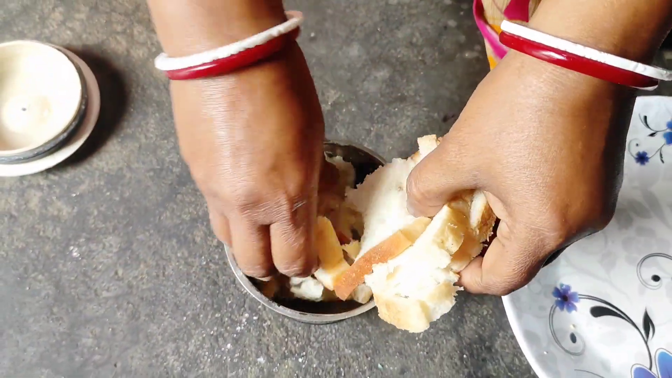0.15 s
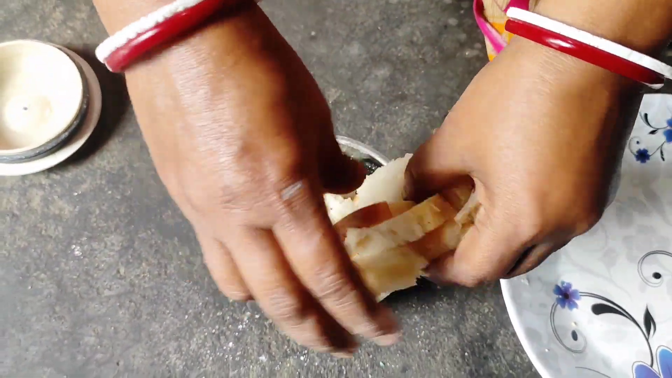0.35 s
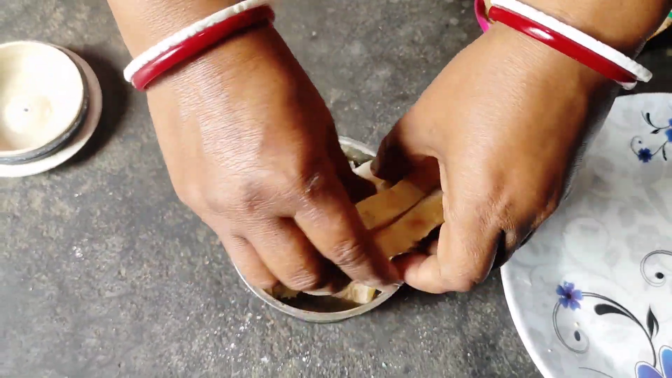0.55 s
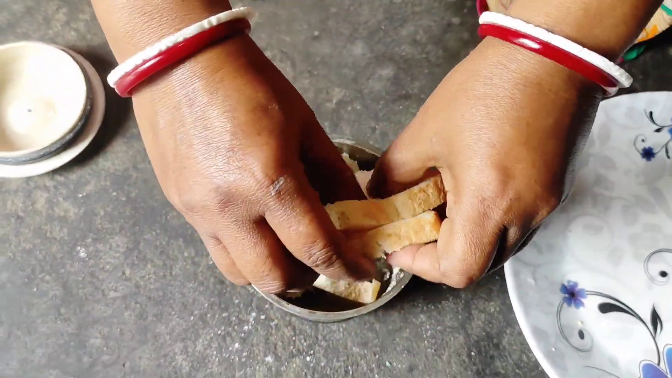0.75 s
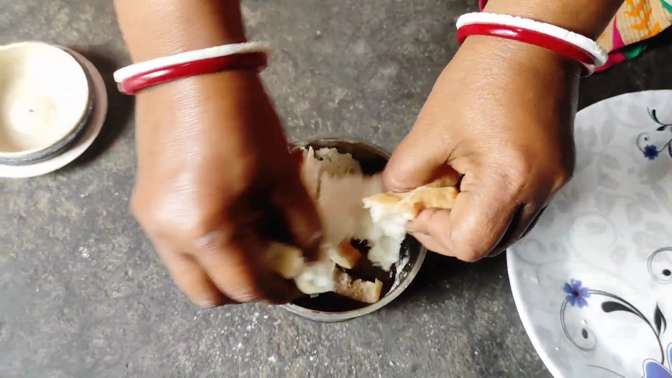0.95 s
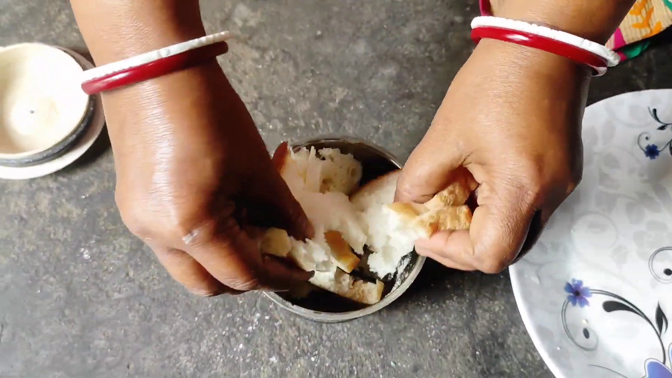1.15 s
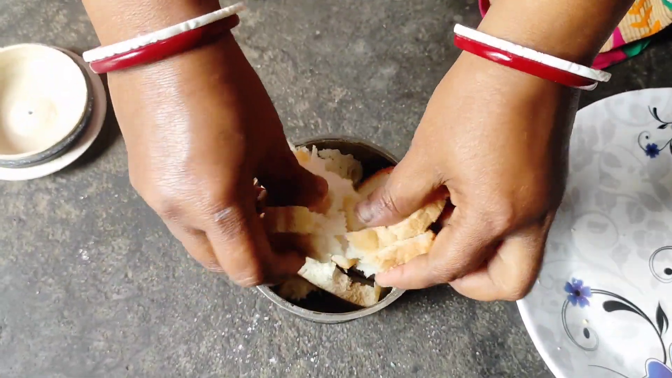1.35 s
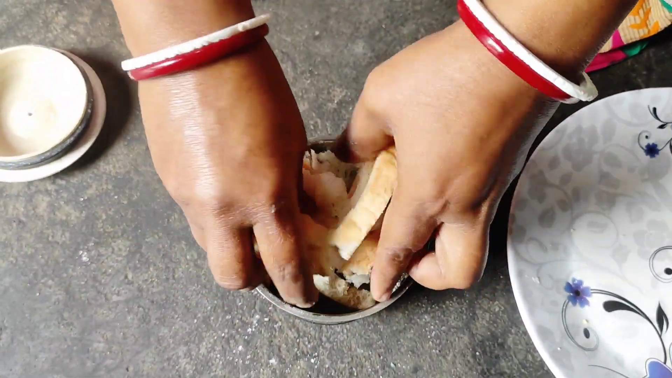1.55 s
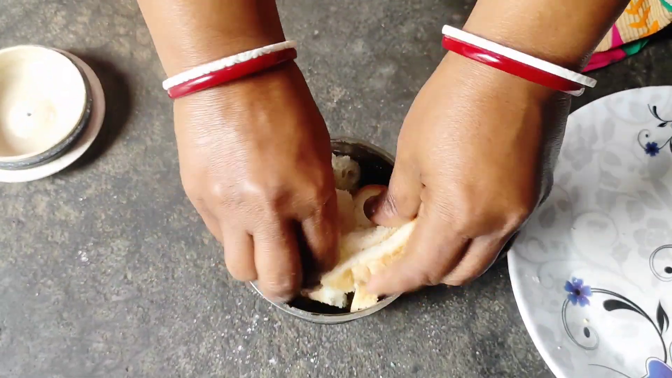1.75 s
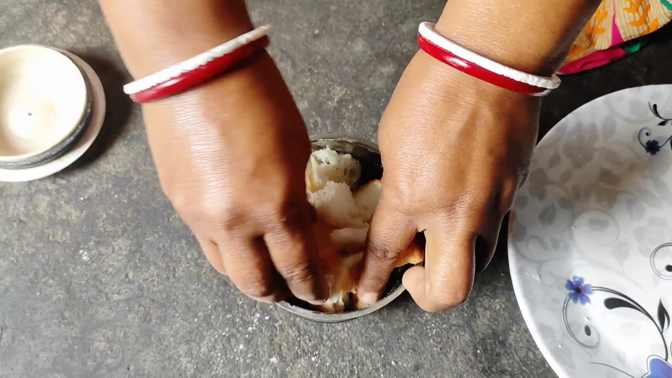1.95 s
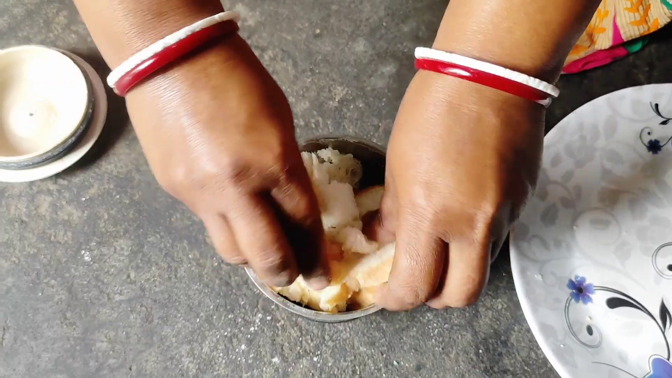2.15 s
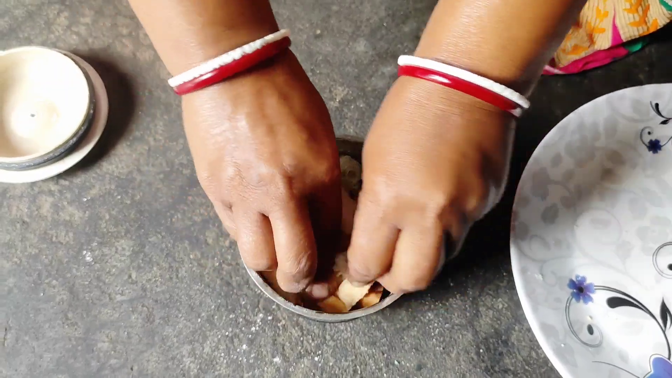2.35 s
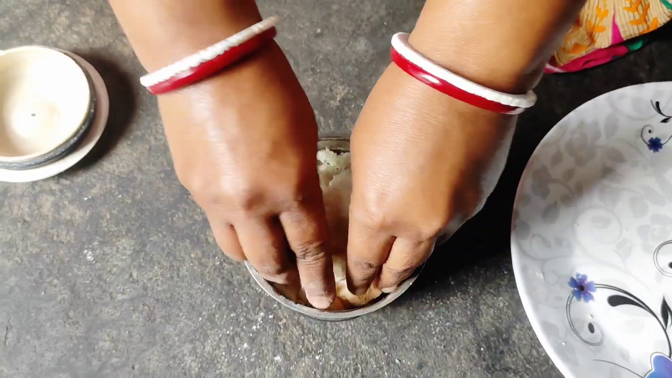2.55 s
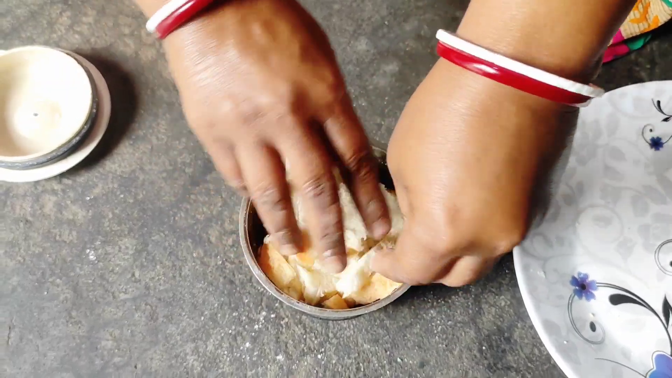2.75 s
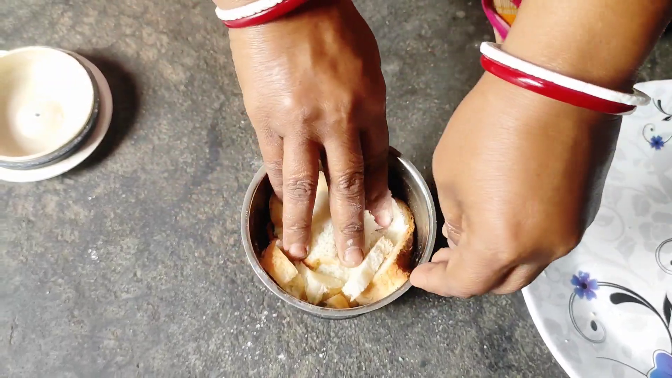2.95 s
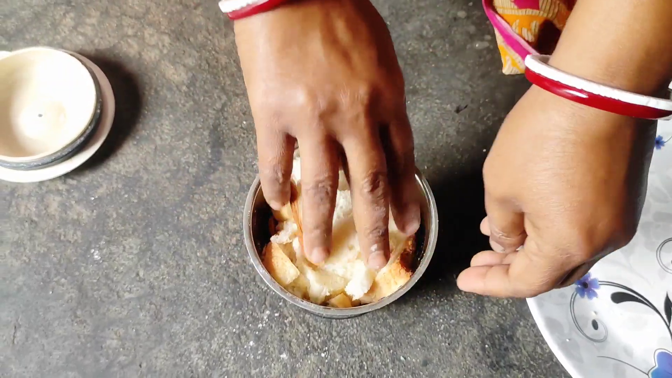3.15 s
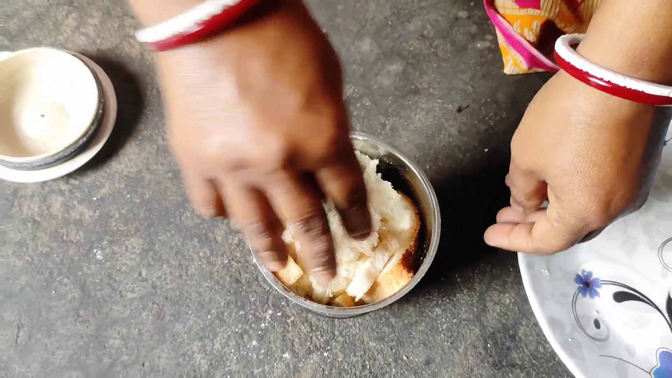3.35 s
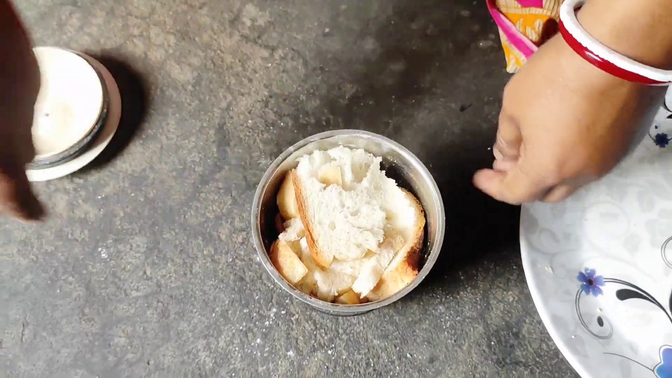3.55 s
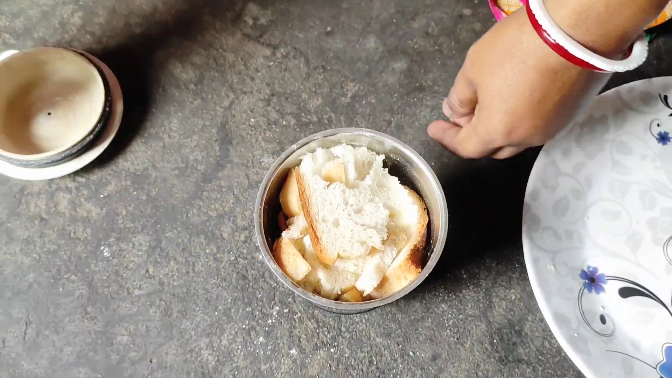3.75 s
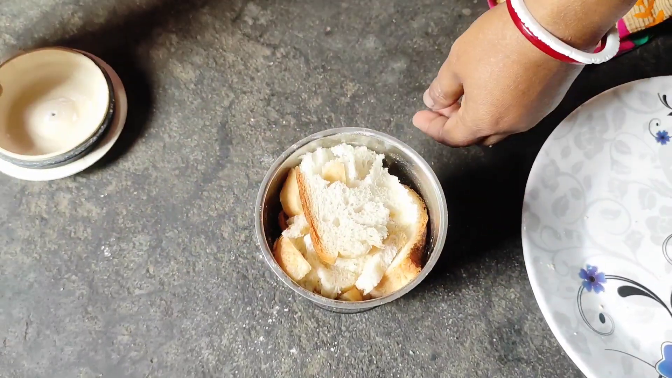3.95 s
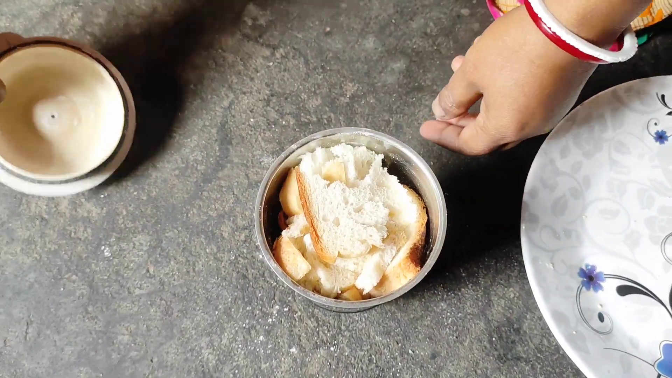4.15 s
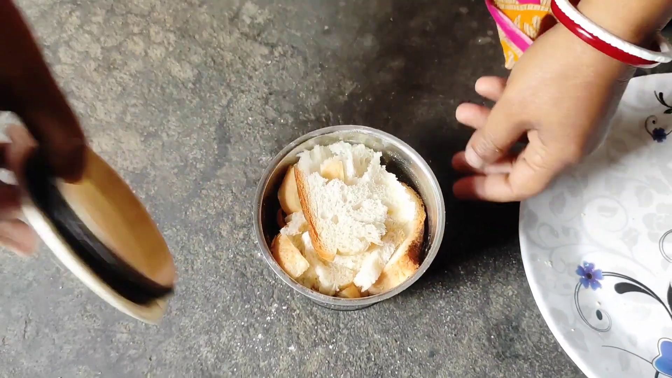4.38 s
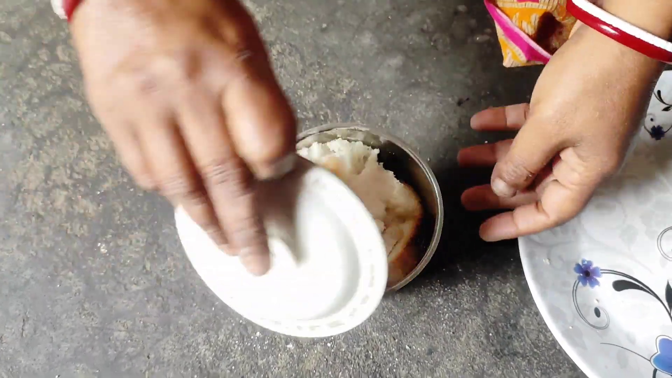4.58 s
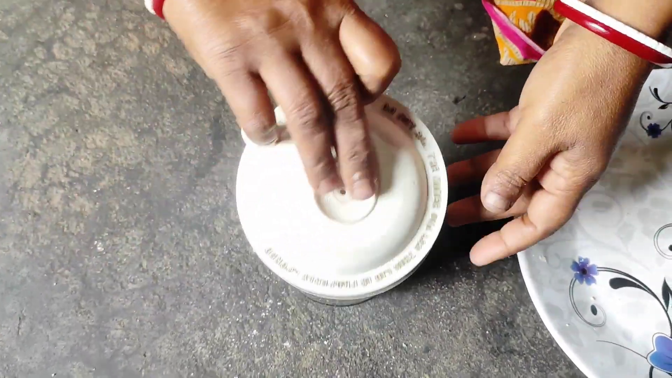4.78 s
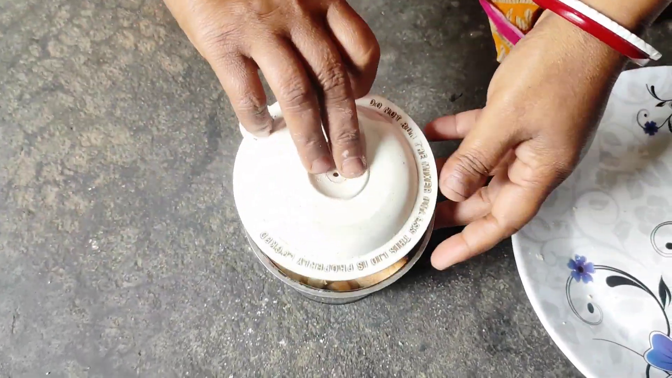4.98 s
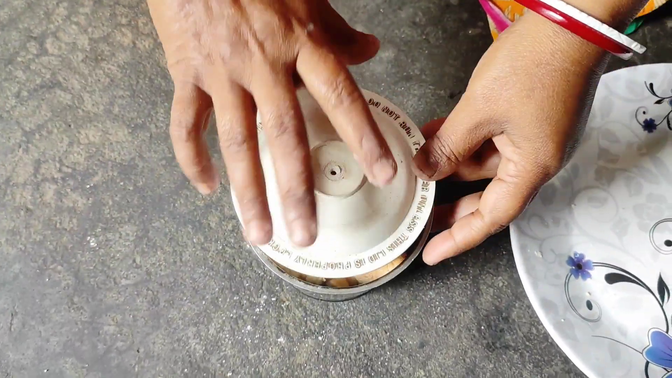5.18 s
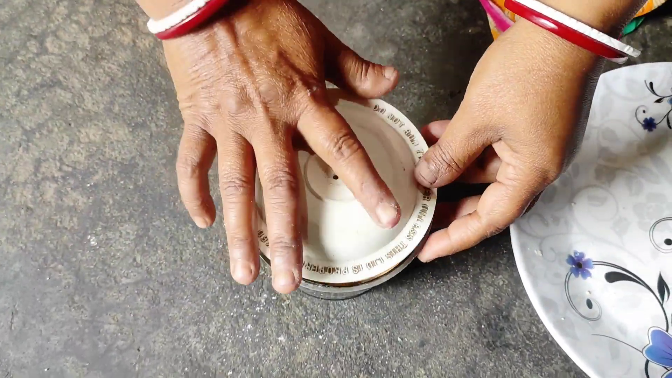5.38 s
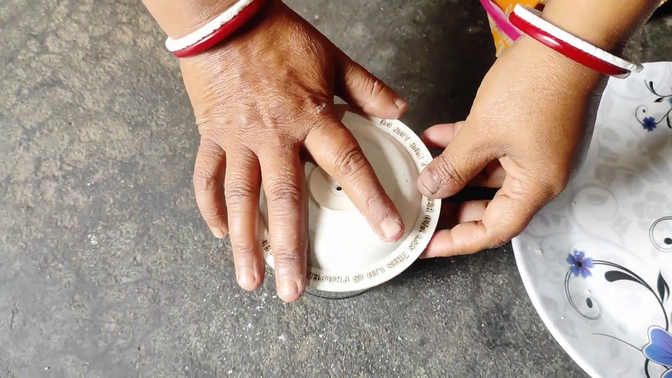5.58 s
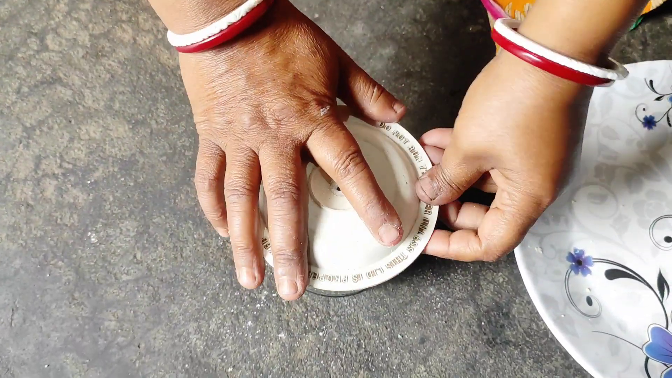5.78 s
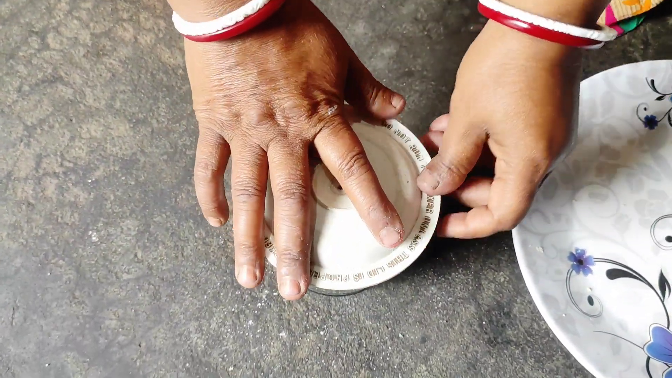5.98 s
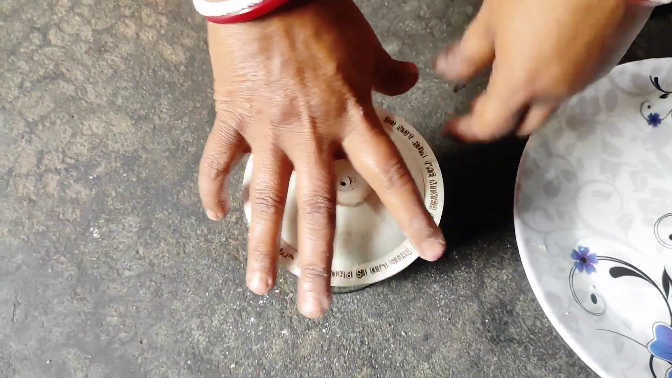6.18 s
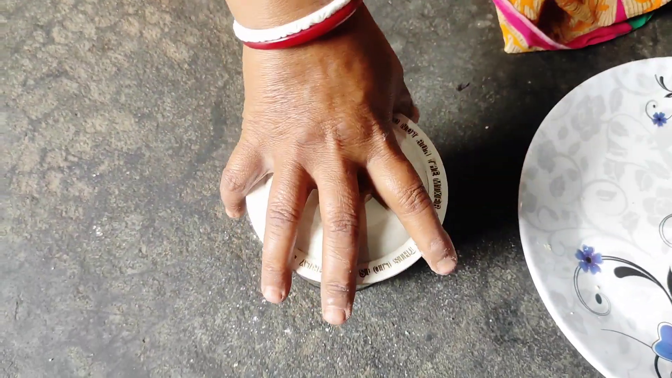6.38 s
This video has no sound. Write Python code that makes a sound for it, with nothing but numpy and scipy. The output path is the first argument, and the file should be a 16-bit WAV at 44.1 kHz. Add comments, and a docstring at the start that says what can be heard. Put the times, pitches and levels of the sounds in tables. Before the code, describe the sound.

Close stereo pickup from above in a bare, hard-walled home: soft bread tearing and small nail and crust ticks over low hum, one faint bangle clink, thin echoing bird whistles outside. After a pause, the lid edge ticks on stone, a bright plastic knock hits the steel rim, hollow taps follow, then a very sharp clack. A brief stuttering twist with muffled thuds ends it, leaving light ticks, a rub and bird chirps.

```python
"""A softly humming, hissing room and dry ticks of crust come first, then bread torn into a small steel jar.
The plastic lid catches on a stone floor as it is lifted, knocks onto the rim, is pressed down and twisted shut.
Short pushes excite decaying modes of lid, steel and trapped air; stick-slip drives the twist; band-limited
noise makes ticks, tearing and room noise. Gliding sines make birds far outside, heard mostly as echo.
Hard walls answer the jar; a phone held above hears it in stereo."""
import sys
import numpy as np
from scipy import signal
from scipy.io import wavfile
from scipy.ndimage import uniform_filter1d

SR = 44100
rng = np.random.default_rng(int(sys.argv[2]) if len(sys.argv) > 2 else 0)


def store_pcm(level_fs):
    """Save levels as 16-bit WAV."""
    pcm = np.round(np.clip(level_fs, -1, 1) * 32767).astype(np.int16)
    wavfile.write(sys.argv[1], SR, np.atleast_2d(pcm).T)


N = 283241
T = np.arange(N) / SR

# modes of the plastic lid: (frequency [Hz], relative level [dB], nominal t60 [s])
LID_MODES = [(754, -27.5, 0.0079), (859, 2.5, 0.02), (1000, -11, 0.0075), (1310, -2.5, 0.011),
             (1470, -8.5, 0.012), (1510, -15, 0.013), (2300, -7, 0.02), (2705, -19.5, 0.005),
             (3070, -32, 0.0096), (4150, -15, 0.0046), (5500, -31.5, 0.0038), (8500, -25, 0.0033)]
# air and bread under the lid: (frequency [Hz], relative level [dB], nominal t60 [s])
THUD_MODES = [(141, -6.5, 0.0048), (213.4, -7.5, 0.026), (285, -4.5, 0.0077)]
HANDS_LEFT_DB = 2  # left over right, for ticks and rustles


def knocks():
    """Modal impact: each blow is a short push into lid, steel wall and trapped air; a longer one is duller."""
    # lid against jar: (time [s], blow level [dB], contact time [ms], steel clatter [dB], jar air [dB],
    # thud [dB], ring length factor [ratio; a loose grip rings longer], lid pitch factor [ratio])
    blow_table = [(4.1237, -37, 0.29, 12, -25, -20, 0.86, 1),
                  (4.5876, -9.5, 0.16, -1, -16, -13.5, 1.4, 1.016),
                  (4.644, -20.5, 0.39, -4, -20, -15, 0.97, 1.04),
                  (4.785, -28, 0.58, -26, 2, -0.5, 1.3, 0.92),
                  (4.814, -29.5, 0.77, -12, -6, 0.5, 0.85, 1.05),
                  (4.8422, -22.5, 0.51, -7, 11.5, 0.5, 1, 0.88),
                  (4.9538, -12.5, 0.18, -25, 4, -28, 1.1, 0.96),
                  (4.9605, -11.5, 0.52, -18, -0.5, -23, 0.59, 0.67),
                  (4.962, -4.5, 0.12, -18.5, 7, -19.5, 0.71, 0.94),
                  (4.967, -17, 0.11, -28, 2, -1.5, 0.58, 1.15),
                  (5.519, -43, 0.57, -15.5, -2, 11.5, 2.1, 0.93),
                  (5.589, -25.5, 0.95, 7.5, -2.5, 8.5, 0.88, 0.77),
                  (5.736, -33.5, 0.53, -4, -9, 8, 0.92, 1.3), (5.749, -32.5, 0.67, -2, -5, 2, 1, 0.74),
                  (5.762, -27, 0.66, -10, -11, 6, 1.3, 1.03), (5.776, -27, 0.76, -1, 2, 7, 1.1, 1.2),
                  (5.789, -27, 1, -6, -2, -5, 0.99, 1.32), (5.8014, -30.5, 0.64, 8, -3, 14, 1, 0.93),
                  (5.811, -35.5, 1, -9, 5, 11, 1.1, 1.22), (5.821, -27, 0.58, 3, -2, 7, 1, 1),
                  (6.103, -48, 0.5, -3, 8, -13, 1.6, 0.97), (6.134, -42, 0.3, 3, 6.5, -6, 1.14, 0.9)]
    # modes of the steel wall: (frequency [Hz], relative level [dB], nominal t60 [s])
    steel_modes = [(2227, -15, 0.05), (2940, -28, 0.01), (2970, 2, 0.0086), (3810, -4, 0.0066),
                   (4650, -4, 0.0094), (5480, -5, 0.013), (6380, -6, 0.028), (6900, -19, 0.015),
                   (8200, -44, .012)]
    # air in the jar, sounding with each blow at its own level:
    # (frequency [Hz], relative level [dB], t60 [s])
    air_modes = [(464, -4.5, 0.012), (570, 4, 0.01)]
    # close lid modes blurred together: (frequency [Hz], width [Hz], relative level [dB], nominal t60 [s])
    lid_rattle = (1498.5, 1603.5, -7.5, 0.0454)
    lid_left_db = -1
    loose_tilt_db = 0.5  # a loose grip frees upper lid modes: dB per octave and unit of extra ring length
    seated_s, loose_thud_pitch = 5.2, 1.32  # the thud is higher until the lid is seated

    out, t = np.zeros((2, N)), T[:SR // 8]
    for s, db, ms, steel_db, air_db, thud_db, longer, pitch in blow_table:
        push = np.hanning(int(ms * SR / 1000) + 3)[None]
        # the many close wall modes between the clear ones blur into a short rattle
        rattle = undb(-0.5) * unit(band(pair(5000, len(t), 2500), 3300, 13000)) * fade(t, 0.04)
        hz, width_hz, buzz_db, t60 = lid_rattle
        buzz = unit(band(pair(hz, len(t), 2000), hz, width_hz))
        buzz = undb(buzz_db) * buzz * fade(t, longer * t60)
        lid = buzz + ring(LID_MODES, 1320, longer, pitch, loose_tilt_db * (longer - 1))
        steel = undb(steel_db) * (ring(steel_modes, 1800) + rattle)
        shells = above(lid + steel, 847)  # thin shells move little bass
        air = undb(air_db) * above(ring(air_modes), 767)
        thud_pitch = loose_thud_pitch if s < seated_s else 1
        thud = undb(thud_db) * above(ring(THUD_MODES, pitch=thud_pitch), 150)
        blow = signal.fftconvolve(shells + air + thud, push / push.sum(), axes=1)
        add(out, sided(db, lid_left_db) * blow, s)
    return out


def twist():
    """Stick-slip friction: uneven slips of the lid on the rim, and grit between them, drive its modes; plus hiss."""
    # lid twisting on the rim: (time [s], rubbing level [dB], pressing level [dB])
    effort = [(5.6, -53, -50), (5.66, -55.5, -48), (5.685, -40.5, -41.5), (5.729, -39.5, -37.5),
              (5.769, -38, -51), (5.8, -41.5, -38.5), (5.823, -37, -34.5), (5.845, -76, -63)]
    slips_hz, hiss_db = 94.1, -2.5  # mean slip rate; hiss relative to the rubbed lid
    s, rub_db, press_db = np.transpose(effort)

    def gain(db):
        """Interpolation in dB makes the gain glide between table times."""
        return undb(np.interp(T, s, db, -120, -120))

    slip_count = np.floor(np.cumsum(slips_hz * (1 + .3 * walk(70)) / SR))
    slips = np.diff(slip_count, prepend=0) * undb(1.53 * walk(60))
    grit = 0.07 * rng.standard_normal(N) * undb(4.0 * walk(400))
    drive = (slips + grit)[None]

    def shake(modes):
        """Convolution with the modal response gives the driven vibration."""
        return unit(above(signal.fftconvolve(drive, ring(modes, 1900), axes=1)[:, :N], 110))

    hiss = band(band(pair(4100, N, 1200), 3040, 5150), 3300, 12800)
    hiss = unit(hiss) * undb(1.6 * walk(130) + 1.47 * walk(900))
    rubbing = gain(rub_db) * (shake(LID_MODES) + undb(hiss_db) * hiss)
    return rubbing + gain(press_db) * shake(THUD_MODES)


def ticks():
    """Damped impulses: ticks from the hands, a clink of bangles and the lid's edge on stone."""
    # dry ticks of crust and nails, and the crack of the lid's edge:
    # (time [s], peak level before panning [dB], frequency [Hz], width [Hz])
    tick_table = [(0.031, -44.5, 3640, 4000), (0.159, -36, 4650, 1280), (.256, -47, 4060, 1000),
                  (1.4, -51, 400, 560), (1.93, -44, 8500, 1500), (2.03, -51, 4900, 1111),
                  (2.6, -40, 3094, 1111), (2.322, -39, 1200, 1200), (2.343, -46, 1200, 1400),
                  (3.4006, -46, 4550, 3778), (4.59, -42, 12500, 4000), (4.843, -23.5, 4200, 7000),
                  (4.962, -27, 17000, 8000), (5.5886, -28.5, 4230, 3530), (6.018, -50, 5630, 900),
                  (6.074, -48, 5600, 1200)]
    # bangles touch: (time [s], reference peak level [dB])
    clinks = [(2.4773, -36)]
    # parts of the bangle sound: (frequency [Hz], width [Hz], relative peak level [dB], t60 [s])
    bangle = [(8500, 7500, 4, 0.01), (6400, 370, -12.5, 0.099), (4550, 640, -6.5, 0.034)]
    # the lid catches on the stone as it is lifted: (time [s], reference peak level [dB])
    catches = [(3.9935, -39.5), (4.014, -35.5), (4.071, -36), (4.1245, -38.5)]
    # parts of the lid edge sound: (frequency [Hz], width [Hz], relative peak level [dB], t60 [s])
    lid_edge = [(2520, 300, 0, 0.015), (4700, 2900, -1.5, 0.02), (6000, 3600, -3, 0.015)]
    tick_t60_s = 0.016

    out = np.zeros((2, N))
    for s, db, hz, width_hz in tick_table:
        add(out, tick(db, hz, width_hz, tick_t60_s), s)
    for events, body in ((clinks, bangle), (catches, lid_edge)):
        for s, db in events:
            parts = [tick(db + part_db, hz, width_hz, t60) for hz, width_hz, part_db, t60 in body]
            add(out, sum(parts), s)
    return sided(0, HANDS_LEFT_DB) * out


def rustles():
    """Granular noise: grainy bands with random snaps swell and die away, mostly as fibres parting."""
    # bread tearing, fingers and lid rubbing; near 6.1 s the hazy echo of a bird's chirp:
    # (time of greatest swell [s], length [s], relative level [dB], frequency [Hz], nominal width [Hz])
    swells = [(0.41, 0.11, -50.5, 3000, 4000), (0.929, 0.24, -55.5, 4000, 2500),
              (0.97, 0.049, -52, 3830, 5000), (1.058, 0.33, -59, 4400, 1800),
              (1.411, 0.14, -52.5, 3200, 3880), (1.468, 0.14, -56.5, 2600, 4030),
              (1.65, 0.22, -53, 2690, 2500), (1.658, 0.12, -62, 5340, 900), (1.912, 0.4, -55, 3880, 5200),
              (2.261, 0.048, -56, 1240, 500), (2.278, 0.26, -53, 2820, 5700),
              (2.291, 0.037, -50, 1070, 710), (2.335, 0.05, -46, 1100, 1320),
              (2.412, 0.12, -52, 3050, 4650), (2.482, .05, -54, 1780, 2500),
              (2.602, 0.36, -61.5, 5500, 4250), (3.408, 0.12, -50, 3730, 3460),
              (3.462, 0.13, -53.5, 3040, 2020), (3.474, 0.1, -53, 6000, 2830),
              (3.464, 0.16, -64.5, 10000, 5000), (4.007, 0.11, -49, 2250, 1610),
              (4.07, 0.055, -57, 2540, 1310), (4.148, 0.16, -54, 1650, 2170),
              (4.299, 0.22, -51.5, 1900, 5000), (4.416, 0.092, -51, 3070, 2620), (4.8, .14, -50, 885, 1200),
              (5.415, 0.24, -52, 3860, 4150), (5.961, 0.25, -53, 4370, 4500),
              (6.07, 0.12, -54.5, 7800, 1625), (6.085, 0.081, -43, 4140, 1700),
              (6.155, 0.065, -48.5, 4300, 1200), (6.395, 0.11, -52.5, 4480, 2550)]
    # a short swell starts suddenly, a long one slowly: share of the length spent rising, per s of length
    rise_share_per_s = 1.1
    crackle_per_s, crackle_db = 750, -9.5  # snaps, as of single fibres; relative level

    out = np.zeros((2, N))
    for s, length, db, hz, width_hz in swells:
        rise = length * np.clip(rise_share_per_s * length, .1, .5)
        fall = length - rise
        t = T[:int((rise + 4 * fall) * SR)] - rise
        shape = np.where(t < 0, (1 + t / rise) ** 2, np.exp(-(np.abs(t) / fall) ** 1.07))
        grain = undb(0.9 * walk(154.0, len(t)) + 0.8 * walk(28.3, len(t)))
        snapping = rng.random(len(t)) < crackle_per_s / SR
        snap_db = crackle_db + 5.2 * np.minimum(rng.exponential(size=len(t)), 2)
        # rarer snaps are made stronger
        snaps = snapping * undb(snap_db) * np.sqrt(SR / crackle_per_s) / 3
        hiss = band(pair(hz, len(t), 670) * (1 + snaps), hz, width_hz)
        hiss = band(hiss, hz, 1.37 * width_hz)
        add(out, sided(db, HANDS_LEFT_DB) * shape * grain * unit(hiss), s - rise)
    return out


def room(x):
    """Reverberation of hard walls: a dense tail builds over a few ms, each band with its own decay."""
    # (frequency [Hz], relative level [dB], t60 [s])
    wall_bands = [(145, -7, 0.57), (317, -7.5, 0.63), (547, -7, 0.74), (920, -7, 0.32), (1400, -10, 0.43),
                  (2420, -3.5, 0.47), (4400, -2.5, 0.42), (7000, -3.5, 0.45), (11200, -11, 0.41)]
    walls_s, beyond_db = .15, -1  # the near walls answer for this long; a weaker tail stays

    t, tail = T[:SR // 2 + SR // 4], 0
    for hz, db, t60 in wall_bands:
        build = 1 - np.exp(-t / .004)
        part = band(pair(hz, len(t), 900), hz, .55 * hz) * fade(t, t60) * build
        part = part * undb(beyond_db * np.clip((t - walls_s) / .02, 0, 1))
        # offset the greater energy of a longer decay
        tail = tail + undb(db) * part / np.sqrt(t60 * SR / np.log(1000) / 2)
    return signal.fftconvolve(x.mean(axis=0)[None], tail, axes=1)[:, :N]


def birds():
    """Frequency modulation: wavering, breathy whistles, heard mostly as their echo among the houses."""
    # distant birds: (time [s], length [s], first frequency [Hz], last frequency [Hz],
    # relative level [dB], pitch waver [share])
    whistles = [(0.363, 0.082, 3840, 3850, -63, 0.027), (0.418, 0.26, 2305, 2206, -66.5, 0.01),
                (1.133, 0.063, 2035, 2200, -61, 0.028), (1.18, 0.15, 2450, 2270, -60.5, 0.043),
                (1.303, 0.084, 2950, 3080, -63, 0.01), (1.49, 0.11, 2422, 2542, -53.5, 0.042),
                (1.517, 0.07, 2150, 1810, -55.5, 0.02), (1.809, 0.085, 2050, 2360, -47, 0.021),
                (1.878, 0.075, 3550, 3280, -50, .035), (1.88, 0.09, 2250, 1867, -53.5, 0.0096),
                (1.881, 0.095, 2337, 2486, -49, 0.029), (1.903, 0.092, 4320, 4263, -46, 0.011),
                (1.945, 0.076, 3152, 3064, -36, 0.0074), (2.046, 0.026, 3018, 3130, -44, 0.0039),
                (2.428, 0.085, 2600, 2578, -53, 0.0057), (2.689, 0.13, 2716, 2580, -59, 0.016),
                (3.044, 0.12, 3630, 4170, -59.5, .012), (3.114, 0.13, 2630, 2610, -56.5, 0.013),
                (3.512, 0.17, 2680, 2540, -62, 0.016), (5.266, 0.2, 3510, 3420, -60, 0.072),
                (5.981, 0.12, 3080, 3253, -43, 0.015), (6.052, 0.1, 4415, 4650, -42, 0.045)]
    overtone_db, birds_left_db, yard_t60_s = -24.5, 4.5, 0.71

    calls = np.zeros(N)
    for s, length, hz0, hz1, db, waver in whistles:
        n = int(length * SR)
        glide = 1 - np.linspace(1, 0, n) ** 2  # quick at first, then level
        hz = (hz0 + (hz1 - hz0) * glide) * (1 + waver * walk(148.0, n))
        phase = 2 * np.pi * np.cumsum(hz) / SR
        tone = np.sin(phase) + undb(overtone_db) * np.sin(2 * phase)
        # an unsteady whistle is also a breathier one
        breath = unit(band(rng.standard_normal(n), (hz0 + hz1) / 2, 0.24 * hz0))
        breath = (0.12 + 8 * waver) * breath
        loudness = undb(db + 2 * walk(59, n)) * signal.windows.tukey(n, .5)
        add(calls, loudness * (tone + breath), s)
    echo = rng.standard_normal((2, SR)) * fade(T[:SR], yard_t60_s)
    echo = echo / np.sqrt((echo ** 2).sum(axis=1, keepdims=True))
    echoed = signal.fftconvolve(calls[None], echo, axes=1)[:, :N]
    return sided(0, birds_left_db) * (0.57 * calls + echoed)


def floor():
    """Noise spectrum: half-octave bands of room hum and hiss swell together and flicker alone."""
    # (frequency [Hz], relative density [dB per Hz])
    spectrum = [(12, -40), (20, -5.5), (45, 0), (86, 0.5), (120, -6), (186, -6), (214, -11), (323, -10),
                (531, -13), (1250, -19), (2350, -17.5), (2630, -17), (3190, -23), (12000, -35.5),
                (14500, -37.5)]
    floor_db = -54.5  # rms level

    table_hz, table_db = np.transpose(spectrum)
    out, swell = 0, walk(4.9)
    for hz in 22 * 2 ** np.arange(0, 9.6, .5):
        db = np.interp(np.log(hz), np.log(table_hz), table_db) + .6 * swell + walk(9)
        noise = 0.44 * pair(hz, N, 680) + rng.standard_normal((2, N))
        out = out + undb(db) * band(noise, hz, hz * 0.42)
    return unit(out) * undb(floor_db)


def ring(modes, apart_hz=np.inf, longer=1, pitch=1, tilt_db=0):
    """Modal sum: decaying sines; high ones reach the two microphones with different phase."""
    hz, db, t60 = np.transpose(modes)[:, :, None]
    hz = pitch * hz * (1 + .01 * rng.standard_normal(hz.shape))  # the grip shifts the modes
    db = db + tilt_db * np.log2(np.clip(hz / 800, 1, 4))  # dB per octave, from 800 to 3200 Hz
    t = T[:SR // 8]
    skew = np.minimum(hz / apart_hz, 1) ** 2 * rng.uniform(-0.22, 0.72, (len(hz), 1)) * np.pi / 2
    sine, cosine = np.sin(2 * np.pi * hz * t), np.cos(2 * np.pi * hz * t)
    wave = [sine * np.cos(k) + np.sin(k) * cosine for k in (skew, -skew)]
    db = db + 1.5 * rng.standard_normal((len(hz), 1))
    return (undb(db) * fade(t, longer * t60) * wave).sum(axis=1)


def tick(db, hz, width_hz, t60):
    """Impulse response: a click and a few ms of grit ring a small, well damped thing."""
    t = T[:SR // 10]
    burst = band((4 * (t == 0) + pair(hz, len(t), 2800)) * fade(t, t60), hz, width_hz)
    burst = band(burst, hz, 1.5 * width_hz)
    return undb(db) * burst / np.abs(burst).max(axis=1, keepdims=True)


def pair(hz, size, apart_hz):
    """Spatial coherence: noise at two microphones is alike in the bass, unrelated in the treble."""
    alike = 1 / (1 + (hz / apart_hz) ** 2)
    mid, side = rng.standard_normal((2, size))
    return np.sqrt(1 + alike) * mid + np.sqrt(1 - alike) * side * np.array([[1], [-1]])


def walk(rate, size=N):
    """Smoothed randomness: levels held 1 / rate s and slewed twice; spread near 1."""
    k = int(SR / rate)
    steps = np.repeat(rng.standard_normal(size // k + 1), k)
    return 1.3 * uniform_filter1d(uniform_filter1d(steps, k), k)[:size]


def band(x, hz, width_hz):
    """Band-pass filtering around a geometric centre."""
    edge = np.sqrt(hz ** 2 + width_hz ** 2 / 4) + np.array([-.5, .5]) * width_hz
    edge = np.clip(edge, 10, .45 * SR)
    return signal.sosfilt(signal.butter(2, edge, "bandpass", fs=SR, output="sos"), x)


def above(x, hz):
    """High-pass filtering."""
    return signal.sosfilt(signal.butter(3, hz, "highpass", fs=SR, output="sos"), x)


def fade(t, t60):
    """Exponential decay: 60 dB down after t60."""
    return np.exp(-np.log(1000) * t / t60)


def undb(db):
    """Decibel law: dB to amplitude gain."""
    return 10 ** (np.asarray(db) / 20)


def unit(x):
    """Normalization to rms 1."""
    return x / np.sqrt(np.mean(x ** 2))


def sided(db, pan_db):
    """Level difference between the channels: left and right gains, pan_db apart."""
    return undb(db + np.array([[pan_db], [-pan_db]]) / 2)


def add(out, x, s):
    """Superposition: mix a sound in at a time in s."""
    i = int(s * SR)
    out[..., i:i + x.shape[-1]] += x[..., :N - i]


def scene():
    """Superposition: hands and lid close by, in the room; birds and floor around."""
    left_lag_ms = .18  # the jar is nearer the right microphone
    blows, rub, small = knocks(), twist(), ticks()
    near = blows + rub + small
    near = np.array([np.roll(near[0], int(left_lag_ms * SR / 1000)), near[1]])
    # the walls answer the three sources in slightly different measure
    walls = room(blows + 1.04 * rub + 0.94 * small)
    return near + walls + rustles() + birds() + floor()


def record(dry):
    """Saturation and filtering: loud peaks clip at full scale; a low-pass keeps the sound below 14.5 kHz."""
    left_db, top_hz = 0.07, 14500  # the left microphone is a little more sensitive
    cut = signal.ellip(8, .3, 60, top_hz, fs=SR, output="sos")
    return signal.sosfilt(cut, np.clip(dry * sided(0, left_db), -1, 1))


dry = scene()
out = record(dry)
store_pcm(out)
```